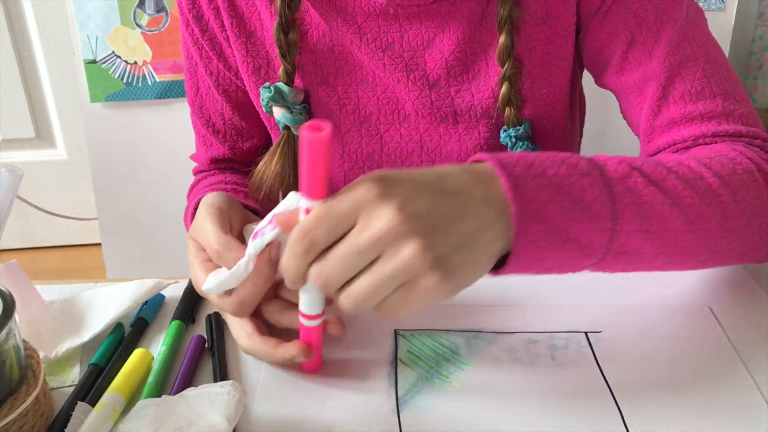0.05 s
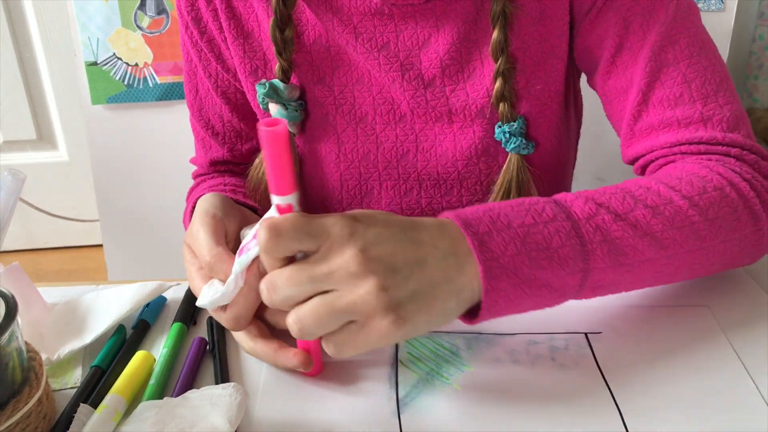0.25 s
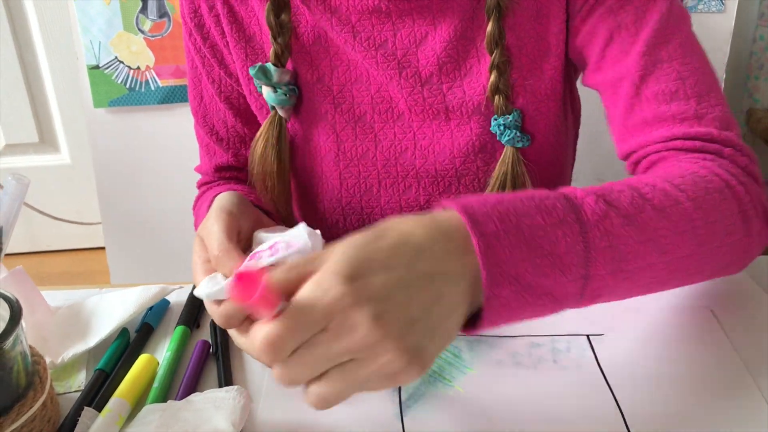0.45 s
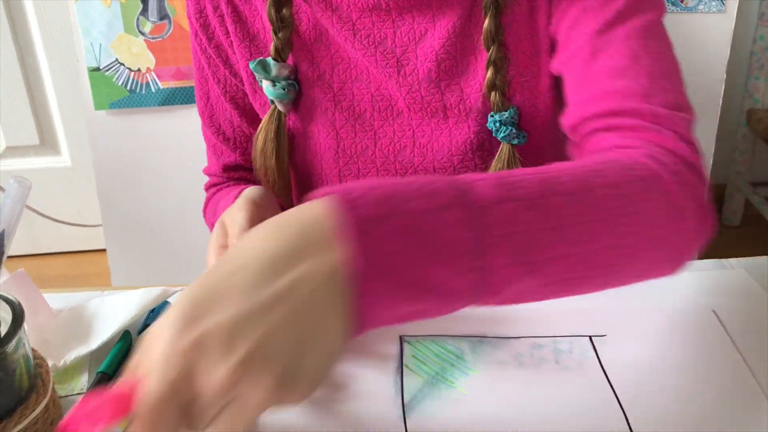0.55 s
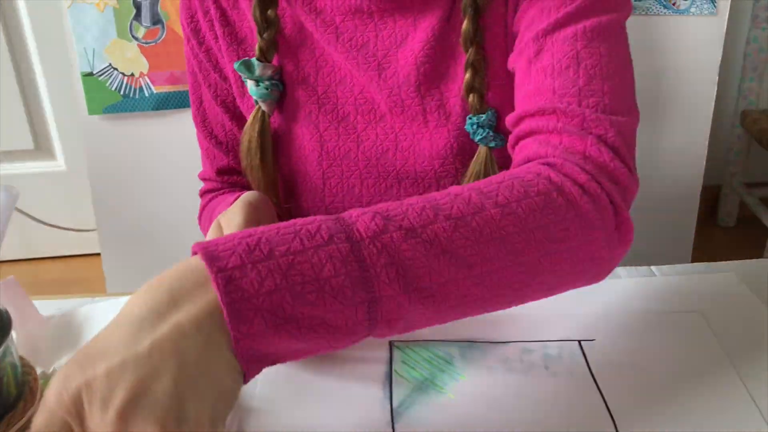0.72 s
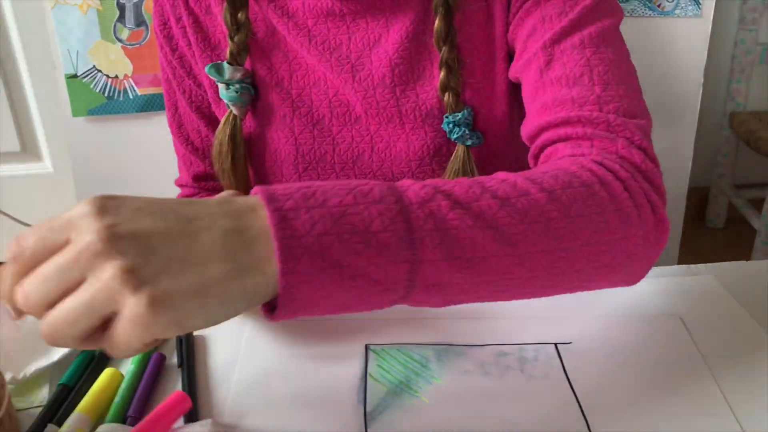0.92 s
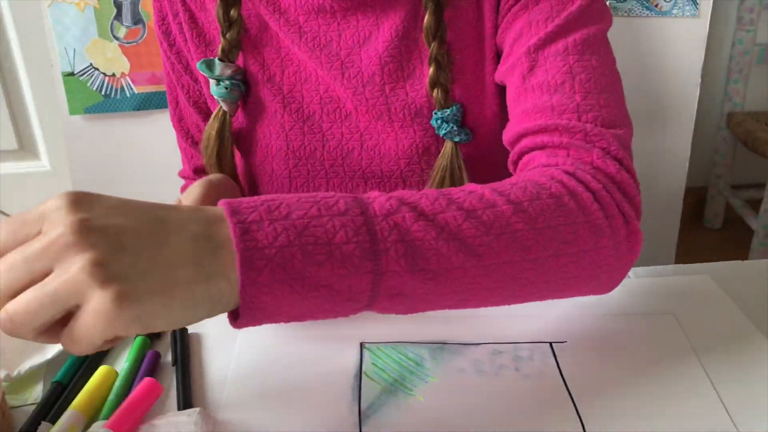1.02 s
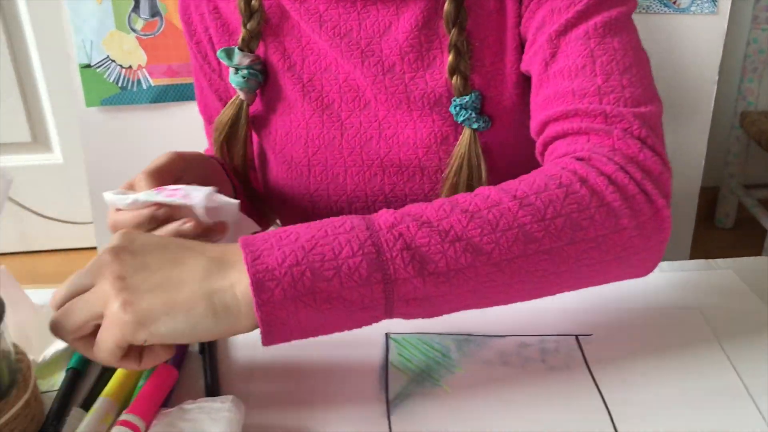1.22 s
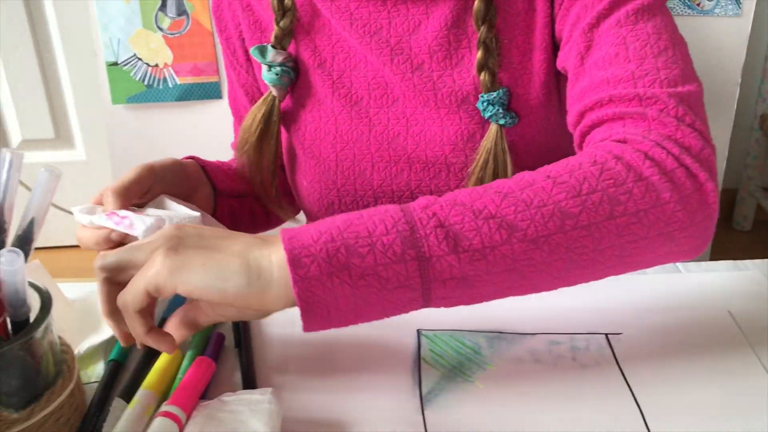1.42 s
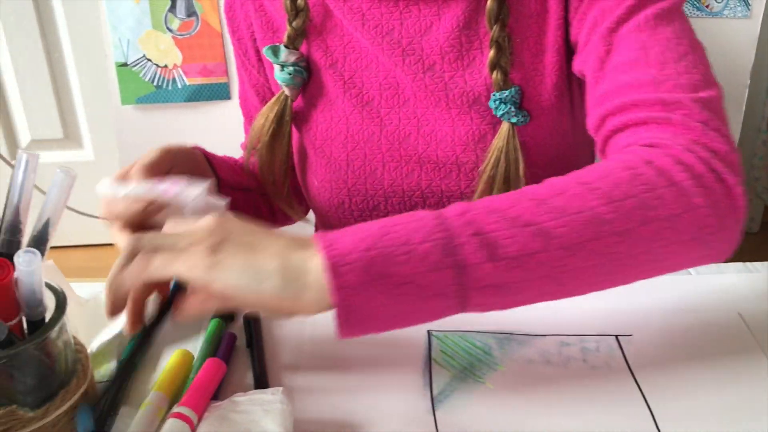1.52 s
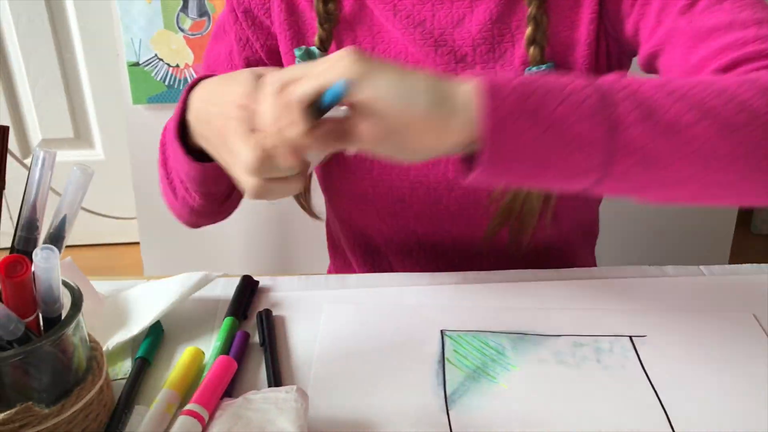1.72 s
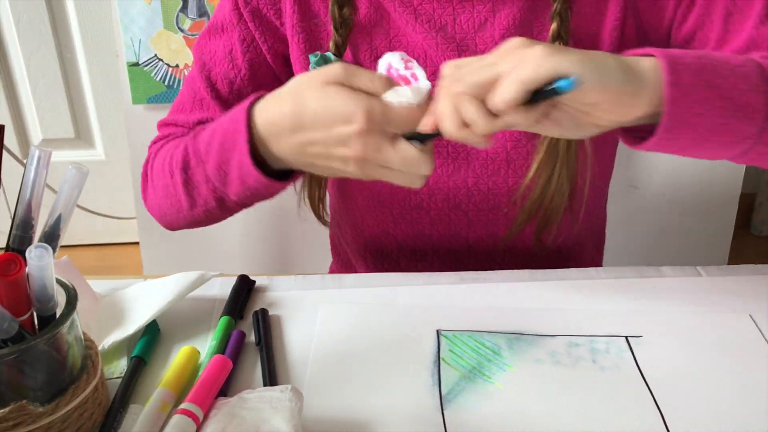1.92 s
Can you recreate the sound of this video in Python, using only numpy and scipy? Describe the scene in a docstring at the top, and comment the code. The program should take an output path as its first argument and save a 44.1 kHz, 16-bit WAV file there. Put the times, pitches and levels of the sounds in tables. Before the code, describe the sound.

A felt-tip marker snaps into its cap with a thump on the table, then drops among other markers, bouncing and clicking. A sleeve rustles faintly and another cap clicks softly, heard close up in a small quiet room.

```python
"""Felt-tip markers on a paper-covered table, heard close up over the hush of a small room.
After a light tap, one is pushed down into its cap: the plastic snaps and the table top thumps.
It drops among the others and bounces, knocking the wood while the barrels click, scuff and slide.
A sleeve rustles as another marker is picked out, and near the end its cap clicks."""
import sys
import numpy as np
from scipy import signal
from scipy.fft import rfft, irfft, next_fast_len
from scipy.io import wavfile

SR = 44100
rng = np.random.default_rng(int(sys.argv[2]) if len(sys.argv) > 2 else 0)


def wrap_up_sound(samples):
    """Save the sound to the file named by the first command line argument, as 16-bit audio."""
    columns = np.atleast_2d(samples).T
    # keep every value between -1 and 1, then stretch to whole-number steps
    tamed = np.clip(columns, -1, 1)
    steps = np.round(tamed * 32767).astype(np.int16)
    wavfile.write(sys.argv[1], SR, steps)


N = 85995

# A cap slips over its ridge: start_s, crack_db, brightness_db_per_octave, ring_db
CAP_SNAPS = [(0.212, -24, -4, -19), (1.9295, -37.5, 1.5, -50.5), (1.9355, -46.5, 4.5, -67),
             (1.9434, -44, 1, -77)]
# Modes of a capped marker pressed end-on: pitch_hz, level_db, t60_s
CAP_MODES = [(669, -10, 0.053), (802, -33.5, 0.36), (1089, -0.5, 0.023), (1321, -20.5, 0.087),
             (2130, -9.5, 0.0083), (3140, -7, 0.0072), (3610, -11.5, 0.0052), (5640, -3.5, 0.0061),
             (7920, -8, 0.0041)]
# A marker hits the table: start_s, level_db, low_cut_hz, brightness_db_per_octave
TABLE_KNOCKS = [(0.064, -49.5, 148, -10.5), (.2130, -25, 119, 0), (.6320, -42.5, 167, 3),
                (0.7284, -27.5, 207, -1), (0.7648, -50.5, 230, 5), (.8300, -57, 600, 1),
                (0.961, -30, 276, -3), (0.9945, -35, 288, -4), (1.0094, -42, 273, -4),
                (1.0200, -44.5, 261, -6.5), (1.1716, -41.5, 169, 1), (1.1918, -47, 222, -0.5),
                (1.2062, -49, 234, 2), (1.3790, -56.5, 135, 2), (1.439, -53.5, 124, -1),
                (1.473, -51.5, 133, -4)]
# Main modes of the table top: pitch_hz, level_db, t60_s
TABLE_MODES = [(169, -12.5, 0.072), (215, -7, 0.049), (263.8, -1, 0.047), (327.6, -1, 0.035),
               (437, 0.5, 0.022), (581, -7.5, 0.033), (690, -8, 0.033), (883, -3.5, 0.018),
               (1425, -13.5, 0.029)]
# Clicks and short rings, mostly barrels touching; low rings are bending, high ones the thin wall, and the
# lowest, near 200 Hz, is the dull thump of the cap meeting the table: start_s, crack_db, pitch_hz, ring_db,
# t60_cycles
CONTACT_CLICKS = [(0.0593, -49, 5600, -52, 50), (0.0635, -53.5, 1360, -53, 25),
                  (0.063, -63, 207, -32.5, 3.5), (0.6304, -60, 9000, -40.5, 59), (0.6315, -49, 947, -30, 4),
                  (0.631, -56, 2500, -43, 9.5), (0.7276, -37, 8400, -29.5, 23.5),
                  (0.7278, -62, 2536, -27.5, 10.5), (0.7281, -32, 898, -22, 16),
                  (0.7278, -71, 10920, -26, 19.5), (0.7643, -48, 1020, -48, 24), (.8300, -70, 2630, -61, 27),
                  (.8760, -55, 5730, -51.5, 33), (0.959, -37.5, 6490, -22.5, 18),
                  (.9600, -55, 787, -35.5, 20), (0.9937, -42.5, 6460, -28.5, 13),
                  (1.0100, -52, 6600, -39, 16), (1.0205, -71, 6600, -45, 17), (1.0960, -58, 945, -47.5, 17),
                  (1.1736, -55.5, 7700, -38.5, 14), (1.1751, -41, 580, -44.5, 23),
                  (1.3786, -50.5, 6000, -52, 33), (1.388, -43, 6470, -37.5, 20),
                  (1.3885, -54, 1010, -46.5, 28), (1.4378, -48, 6250, -47.5, 39),
                  (1.4733, -53.5, 7600, -49, 29), (1.929, -54, 3500, -29, 8), (1.931, -43, 502, -46.5, 12)]
# Barrels scuff as they settle: centre_s, half_width_s, level_db
BARREL_SCUFFS = [(0.656, 0.0035, -61.5), (0.751, 0.0036, -55), (1.171, 0.00053, -48.5),
                 (1.192, 0.0013, -54.5), (1.206, 0.016, -65.5)]
# Sleeve rubs on paper: centre_s, half_width_s, level_db
SLEEVE_RUSTLES = [(0.905, 0.029, -72), (1.441, 0.011, -63.5), (1.54, 0.057, -74), (1.76, 0.046, -69)]
# Tone curves for the noise layers: frequency_hz, level_db
WOOD_EQ = [(100, -24), (250, -1.5), (900, -4), (1600, -8.5), (2800, -21), (4500, -34.5), (15000, -58)]  # the table's dense modes
PLASTIC_EQ = [(200, -20), (500, 7.5), (2500, 0.5), (8000, -3), (10000, -12.5), (12500, -5.5),
              (16000, -20.5)]  # hard plastic cracking or scuffing
CLOTH_EQ = [(400, 3), (1200, 2.5), (2500, -3.5), (6500, 0), (10000, -9.5), (16000, -15)]  # sleeve on paper
WALL_EQ = [(100, -6), (300, 0.5), (3000, 3), (7000, 0.5), (10000, 3.5), (16000, -5)]  # reflections off the walls
HUSH_EQ = [(55, -0.5), (130, 0.5), (223, -1.5), (550, -14.5), (900, -18.5), (1500, -27), (2350, -25.5),
           (3600, -28.5), (7000, -30.5), (16000, -34)]  # room tone
# Reverb decay of the room: frequency_hz, t60_s
ROOM_DECAY = [(150, 0.21), (1000, 0.12), (7000, 0.11), (14000, 0.12)]

CRACK_T60_S, CLICK_RISE_S = 0.0067, 0.0001
WOOD_DB, WOOD_T60_S, KNOCK_RISE_S = -2.5, 0.023, 0.00035
UPPER_RATIO, UPPER_DB, UPPER_T60_CYCLES = 1.282, -6.5, 11.3  # all relative to the lower barrel mode
SLIDE_S, SLIDE_HALF_S, SLIDE_DB, SLIDE_HZ, SLIDE_HALF_HZ = 1.082, 0.032, -78, 7200, 1000
PREDELAY_S, ROOM_RISE_S, HUSH_DB = 0.0016, 0.0041, -63.5
FIST_CUT_HZ, LOW_CUT_HZ, TOP_HZ = 12400, 77, 15950

T = np.arange(SR // 2) / SR  # the span of one hit
HZ = np.fft.rfftfreq(len(T), 1 / SR)
SCENE_T, SCENE_HZ = np.arange(N) / SR, np.fft.rfftfreq(N, 1 / SR)


def cap_snaps():
    """The cap jumps its ridge and rings the whole marker; the fist around it muffles the ring's top."""
    out = np.zeros(N)
    fist = signal.butter(6, FIST_CUT_HZ, fs=SR, output="sos")
    body = signal.sosfilt(fist, ring(CAP_MODES, CLICK_RISE_S))
    for start_s, crack_db, bright_db, ring_db in CAP_SNAPS:
        snap = crack(crack_db, bright_db) + amp(ring_db) * body
        add(out, start_s, in_room(snap, wet_db=-10.5))
    return out


def table_knocks():
    """Each blow rings the same table top: hard contact is brighter, an end-on push booms."""
    out = np.zeros(N)
    for start_s, level_db, low_cut_hz, bright_db in TABLE_KNOCKS:
        modes = [(hz, db + tilt(hz, 383, bright_db), t60) for hz, db, t60 in TABLE_MODES]
        wood_eq = curve(WOOD_EQ, HZ) + tilt(HZ, 560, bright_db)
        dense_modes = amp(WOOD_DB + bright_db) * burst(wood_eq, WOOD_T60_S, KNOCK_RISE_S)
        knock = high_pass(ring(modes, KNOCK_RISE_S) + dense_modes, low_cut_hz, order=3)
        add(out, start_s, amp(level_db) * in_room(knock, wet_db=-7.5))
    return out


def contact_clicks():
    """Hard contacts tick, mostly barrels tapping each other: a crack and a short ring of two close modes in
    opposite phase."""
    out = np.zeros(N)
    for start_s, crack_db, hz, ring_db, t60_cycles in CONTACT_CLICKS:
        lower = ring([(hz, ring_db, t60_cycles / hz)], CLICK_RISE_S)
        upper = ring([(hz * UPPER_RATIO, ring_db + UPPER_DB, UPPER_T60_CYCLES / hz)], CLICK_RISE_S)
        barrel = high_pass(lower - upper, 0.74 * hz, order=3)  # a thin wall radiates little bass
        add(out, start_s, in_room(crack(crack_db) + barrel, wet_db=-11))
    return out


def crack(level_db, bright_db=0):
    """The broadband tick of hard plastic, the attack of each snap and click."""
    eq = curve(PLASTIC_EQ, HZ) + tilt(HZ, 6100, bright_db)
    return amp(level_db) * burst(eq, CRACK_T60_S, CLICK_RISE_S)


def rubbing(eq, swells):
    """Swells of friction noise: brief for plastic on plastic, long and soft for the sleeve."""
    envelope = sum(amp(db) * bell(SCENE_T, centre_s, half_s) for centre_s, half_s, db in swells)
    return steady_noise(amp(curve(eq, SCENE_HZ))) * envelope


def barrel_slide():
    """The dropped marker slides to rest along its neighbours: a narrow hiss from its thin wall."""
    hiss = steady_noise(bell(SCENE_HZ, SLIDE_HZ, SLIDE_HALF_HZ))
    return amp(SLIDE_DB) * hiss * bell(SCENE_T, SLIDE_S, SLIDE_HALF_S)


def in_room(sound, wet_db):
    """A hit plus the short answer of the walls, with a fresh tail for each spot on the table."""
    hz, t, bands = signal.stft(rng.standard_normal(len(T)), SR, nperseg=256)
    decay = np.exp(-np.log(1000) * t / curve(ROOM_DECAY, hz)[:, None])
    bands = bands * amp(curve(WALL_EQ, hz))[:, None] * decay
    fade_in = np.clip((T - PREDELAY_S) / ROOM_RISE_S, 0, 1)
    tail = signal.istft(bands, SR)[1][:len(T)] * fade_in
    reverb = signal.fftconvolve(sound, tail / np.linalg.norm(tail))[:len(T)]
    return sound + amp(wet_db) * reverb


def room_tone():
    """A steady bed of low hush."""
    return amp(HUSH_DB) * steady_noise(amp(curve(HUSH_EQ, SCENE_HZ)))


def ring(modes, rise_s):
    """Damped modes, all set off by one blow."""
    return sum(amp(db) * np.sin(2 * np.pi * hz * T) * hit_envelope(t60, rise_s) for hz, db, t60 in modes)


def burst(eq_db, t60_s, rise_s):
    """A dying puff of noise, coloured by a minimum-phase EQ so nothing sounds ahead of the attack."""
    envelope = hit_envelope(t60_s, rise_s)
    noise = unit_rms(rng.standard_normal(len(T)) * envelope) * np.sqrt(np.mean(envelope ** 2))
    cepstrum = irfft(np.log(unit_rms(amp(eq_db)) + 1e-6))
    cepstrum[1:len(T) // 2] *= 2
    cepstrum[len(T) // 2 + 1:] = 0
    return irfft(rfft(noise) * np.exp(rfft(cepstrum)))


def steady_noise(gains):
    """Scene-long noise of rms 1, coloured by a gain per frequency."""
    return unit_rms(irfft(rfft(rng.standard_normal(N)) * gains, N))


def hit_envelope(t60_s, rise_s):
    """A quick attack and an exponential decay."""
    return np.exp(-np.log(1000) * T / t60_s) * (1 - np.exp(-T / rise_s))


def bell(x, centre, half_width):
    """A smooth Gaussian hump."""
    return np.exp(-((x - centre) / half_width) ** 2 / 2)


def curve(points, hz):
    """Read a breakpoint curve on a log frequency axis."""
    point_hz, values = np.transpose(points)
    return np.interp(np.log(hz + 1), np.log(point_hz + 1), values)


def tilt(hz, pivot_hz, db_per_octave):
    """A tilt EQ in dB, levelling off two octaves either side of the pivot."""
    return db_per_octave * np.log2(np.clip(hz / pivot_hz, 1 / 4, 4))


def high_pass(x, hz, order):
    """Roll off the lows."""
    return signal.sosfilt(signal.butter(order, hz, "high", fs=SR, output="sos"), x)


def amp(db):
    """Decibels to gain."""
    return 10 ** (np.asarray(db) / 20)


def unit_rms(x):
    """Scale to rms 1."""
    return x / np.sqrt(np.mean(x ** 2) + 1e-20)


def add(track, start_s, sound):
    """Mix a sound in at its cue."""
    part = track[round(start_s * SR):][:len(sound)]
    part += sound[:len(part)]


def scene():
    """The mono mix: marker hits and soft friction over room tone."""
    friction = barrel_slide() + rubbing(PLASTIC_EQ, BARREL_SCUFFS) + rubbing(CLOTH_EQ, SLEEVE_RUSTLES)
    return (table_knocks() + contact_clicks() + cap_snaps() + friction + room_tone())[None]


def record(dry):
    """Master EQ: roll off the deep bass and cut everything above TOP_HZ."""
    padded = next_fast_len(N + SR // 2)
    spectrum = rfft(high_pass(dry, LOW_CUT_HZ, order=4), padded)
    passband = np.fft.rfftfreq(padded, 1 / SR) < TOP_HZ
    return irfft(spectrum * passband, padded)[..., :N]


dry = scene()
out = record(dry)
wrap_up_sound(out)
```